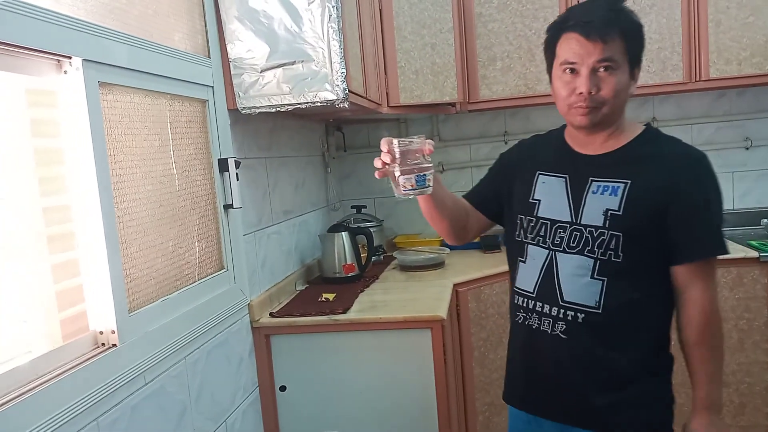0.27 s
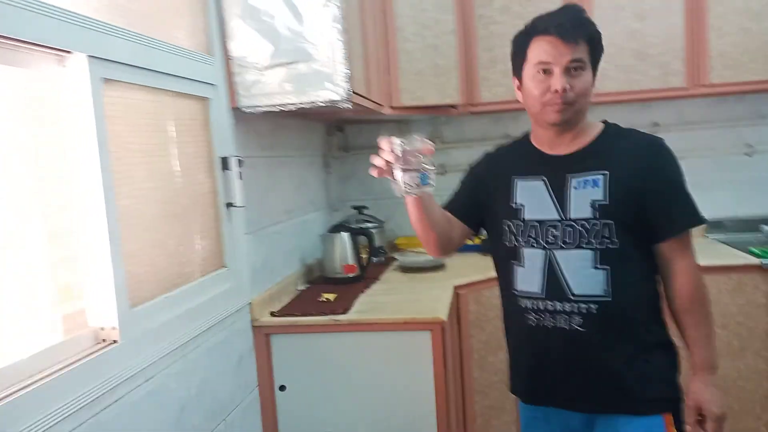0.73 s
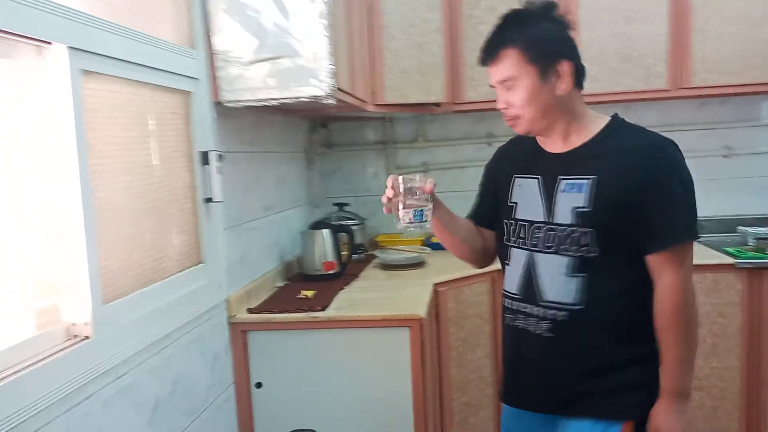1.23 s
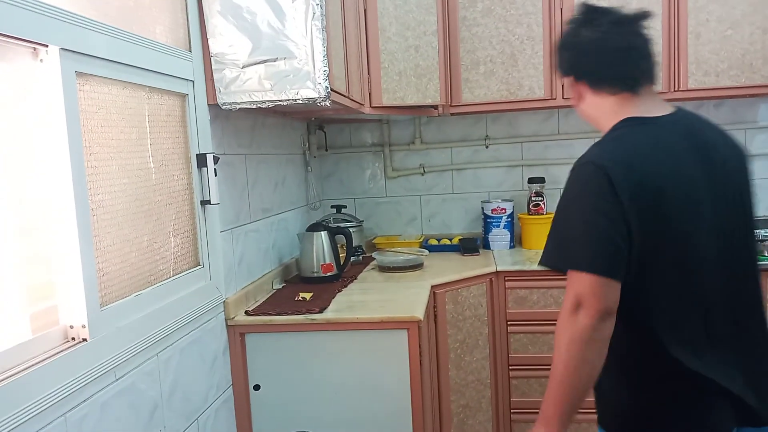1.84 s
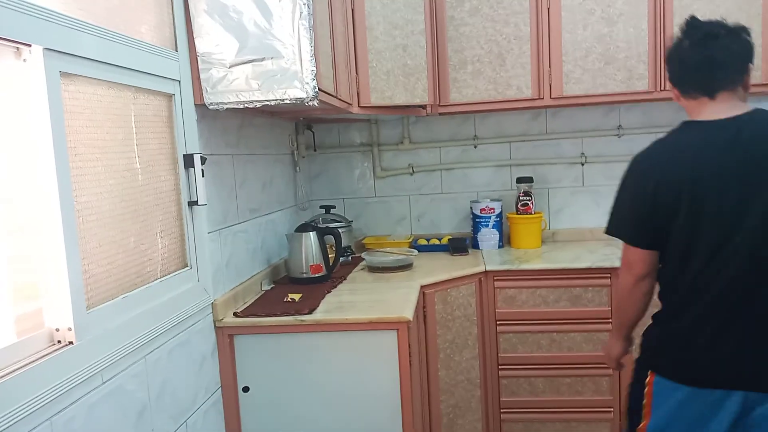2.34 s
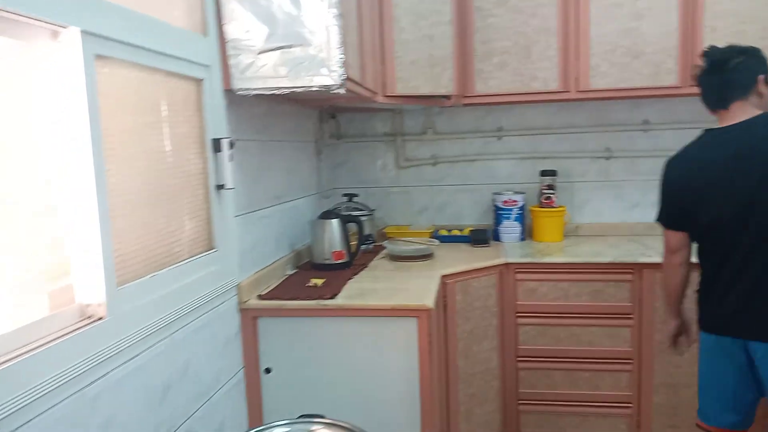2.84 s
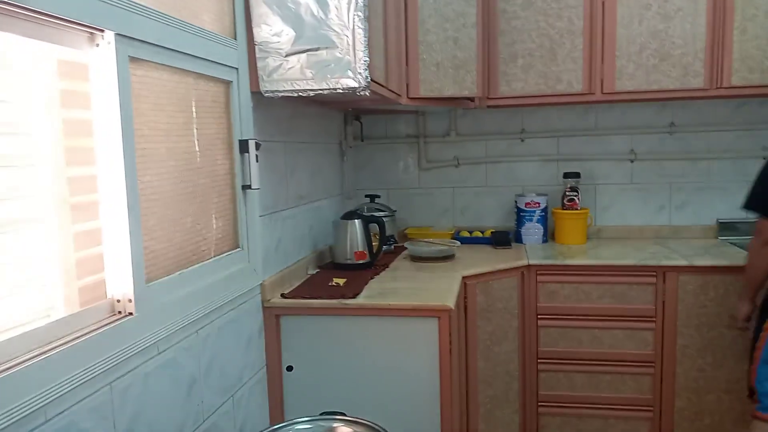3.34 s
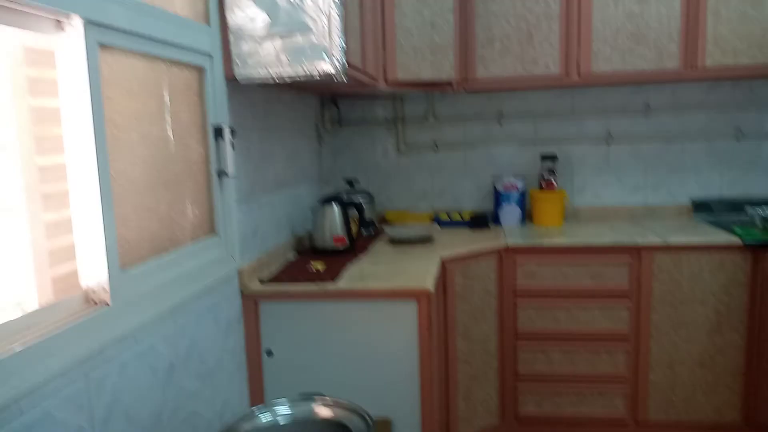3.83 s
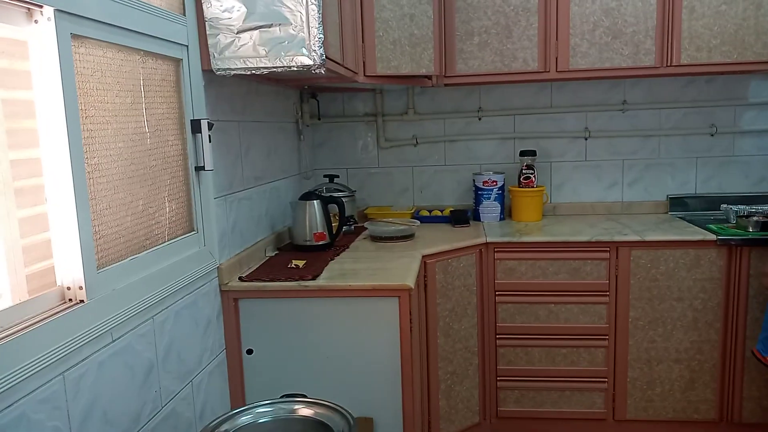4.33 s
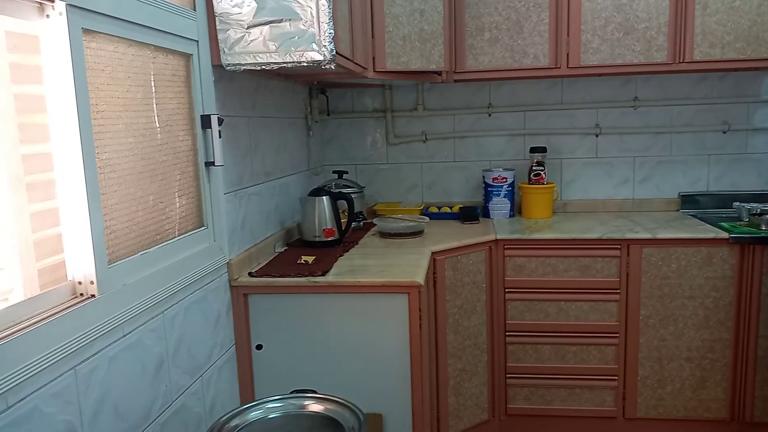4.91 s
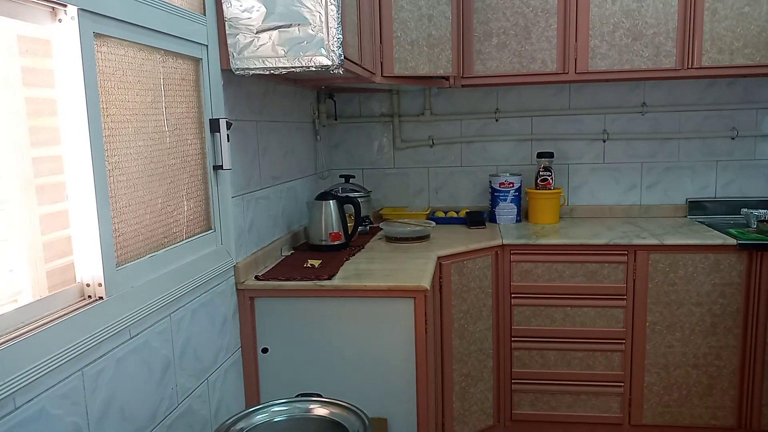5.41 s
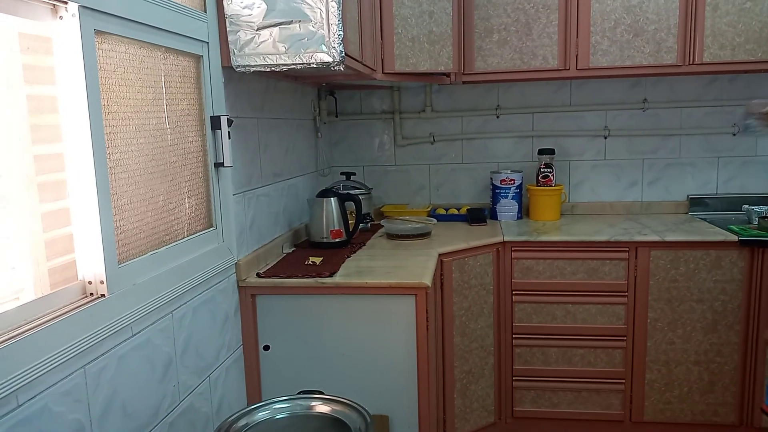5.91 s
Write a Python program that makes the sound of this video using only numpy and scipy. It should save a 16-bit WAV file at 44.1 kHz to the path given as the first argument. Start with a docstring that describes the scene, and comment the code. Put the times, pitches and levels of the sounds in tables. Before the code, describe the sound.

In a tiled kitchen, a phone picks up the soft, continuous bubbling and steamy hiss of a lidded pan, a little louder on the left. Slippers move off with a handful of sharp, thin slaps, gritty drags and dull thuds, each step ringing briefly in the room. Later only lighter shuffles remain while the pan keeps cooking. A low hum and occasional faint, brief tones lie underneath.

```python
"""Food simmers under a lid in a tiled kitchen: tiny bubbles burst by the thousand and ring pan and lid,
steam hisses at the rim, the house rumbles below. Almost at once someone in slippers starts to walk off:
soles slap and scuff, heels thud, the hard room rings after them, and faint hoots come and go.
The last slap falls at 3.3 s; scuffs trail on to about 6 s while the pan keeps simmering.
Two unlike phone microphones listen; the left one is louder and a millisecond late."""
import sys
import numpy as np
from scipy import signal
from scipy.fft import rfft, irfft, next_fast_len
from scipy.io import wavfile
from scipy.ndimage import uniform_filter1d

SR = 44100
rng = np.random.default_rng(int(sys.argv[2]) if len(sys.argv) > 2 else 0)


def generate_wav(signal):
    """Clip the signal to [-1, 1] and save it as 16-bit WAV at the path in sys.argv[1]."""
    frames = np.transpose(np.atleast_2d(signal))
    scaled = np.clip(frames, -1, 1) * 32767
    pcm = np.round(scaled).astype(np.int16)
    wavfile.write(sys.argv[1], SR, pcm)


N = 271950


def simmer(ring_db=-3, hiss_db=-1, foam_bend=0.004):
    """The ringing pan and its steam swell and sink with the strength of the boil."""
    # strength of the boil: t/s, overall level/dB, boost of the low resonances/dB
    strength = [(0.0, -46.5, -0.5), (0.74, -46, 1.5), (1.92, -47, 1), (2.09, -46.5, 2), (3.45, -46, 1),
                (4.1, -47, -0.5), (6.17, -46.5, -2)]
    times, *curves = np.transpose(strength)
    overall_db, boost_db = (np.interp(np.arange(N) / SR, times, curve) for curve in curves)
    ring, hiss = bubbles(), steam()
    # the foam rises and sinks, bending every resonance a little
    bent = np.arange(N) + np.cumsum(foam_bend * walk(7.5))
    ring = np.array([np.interp(bent, np.arange(N), side) for side in ring])
    low = colour(ring, [2600, 3100], [0, -40])  # slow bubbles drive the low resonances
    ring += (undb(boost_db) - 1) * low
    return (level(ring, ring_db) + close_echoes(level(hiss, hiss_db))) * undb(overall_db)


def bubbles(bursts_per_s=9000, wander_db=2):
    """Each bursting bubble is a tiny puff of noise that rings pan and lid."""
    # pan and lid resonances: f/Hz, width/Hz, left level/dB, right level/dB
    resonances = [(688, 23, -9, -7), (783.5, 71, 1.5, 2), (943, 74, 1.5, 3.5), (1045, 41, -4, -3.5),
                  (1350, 87, 4, 6.5), (1432, 102, 5.5, 7), (1564, 190, -2.5, -37), (2147, 130, 5, 3.5),
                  (2350, 97, 2.5, -5), (2512, 180, 2, -20), (3258, 55, -1, 2.5), (3710, 130, 2.5, -1),
                  (4090, 107, 2.5, -6), (4333, 124, 0.5, 2.5), (4584, 110, -2, 5), (4893, 140, 0, 1.5),
                  (5310, 180, -3.5, -12.5), (5600, 93, -6.5, 8.5), (5865, 160, 0, 3), (6250, 180, 5, 1),
                  (6550, 120, 4, -8), (6730, 156, 6.5, -0.5), (7003, 130, 0, -15), (7970, 120, -16, -21),
                  (8115, 170, -0.7, -6), (7440, 260, 3.5, -7)]
    onsets = (rng.random(N) < bursts_per_s / SR).astype(float)
    bursts = level(uniform_filter1d(onsets, size=24) * stereo_noise(0.09), 0)
    ring = np.zeros((2, N))
    for hz, width_hz, left_db, right_db in resonances:
        # the boiling spot wanders, so each resonance swells alone; low ones most
        drift = 0.96 * np.tanh(walk(4.13)) + 2 * np.tanh(walk(18))
        swell = undb(wander_db * (1000 / hz) ** 0.21 * drift)
        mode = band(band(bursts, hz, width_hz), hz, 2 * width_hz) / np.sqrt(width_hz)
        ring += undb([[left_db], [right_db]]) * swell * mode
    return ring


def steam(patchy_db=1.58):
    """Steam escapes at the rim in a bright, unsteady hiss."""
    hiss = colour(stereo_noise(0.15),
                  [540, 640, 700, 1000, 1180, 1400, 1800, 2300, 2900, 4200, 7000, 16000],
                  [-51, -12, -2.5, -4.5, -17.5, -2, -6.5, -0.5, -5.5, 0, 1.5, -5.5])
    hiss *= undb(0.4 * walk(6.43) + 0.23 * walk(25.13))
    for hz in (1100, 1800, 2900):  # the lower hiss comes and goes in patches
        hiss += (undb(patchy_db * walk(6.5)) - 1) * band(hiss, hz, 0.46 * hz)
    return hiss


def slaps(pop_decay_cycles=2.3, snap_decay_s=0.00061):
    """A sole meets the tiles: trapped air pops and the rubber snaps."""
    # sole hits: t/s, pop level/dB, pop f/Hz, snap level/dB
    hits = [(0.477, -28, 3340, -24), (0.4791, -28.5, 1760, -27.5), (0.494, -36, 2200, -40),
            (0.4987, -29, 3540, -25), (1.9656, -23, 2700, -38), (1.969, -33, 2440, -42),
            (2.046, -44, 1900, -45), (2.5075, -25.5, 2400, -41), (2.5101, -29, 2250, -38),
            (2.5225, -27.5, 1000, -46), (2.7512, -39, 2410, -28), (3.26, -55, 9000, -36),
            (3.304, -30, 1580, -27)]
    out, t = np.zeros(N), np.arange(SR // 20) / SR
    bright = level(colour(rng.standard_normal(N), [1500, 4000, 9000, 13000], [1, 5.5, -1.5, 3]), 0)
    for start, pop_db, hz, snap_db in hits:
        span = slice(int(start * SR), int(start * SR) + len(t))
        pop = np.exp(-hz * t / pop_decay_cycles) * np.sin(2 * np.pi * hz * t)
        snap = np.exp(-t / snap_decay_s) * bright[span]
        out[span] += undb(pop_db) * pop + undb(snap_db) * snap
    return colour(out, [500, 1000], [-14, 0])  # a thin sole has no bass


def scuffs(swish_decay_s=0.073):
    """A sole drags over the tiles: grit rasps under it and the sole swishes."""
    # drags: t/s, attack/s, rasp decay at 2 kHz/s, rasp f/Hz, rasp level/dB, swish level/dB
    drags = [(.31, 0.037, .06, 2500, -77, -49), (0.486, 0.016, 0.055, 2480, -48.5, -41.5),
             (1.17, 0.022, 0.053, 2480, -50.5, -45), (1.43, 0.053, 0.057, 2260, -51, -48),
             (1.964, 0.003, 0.073, 1190, -38, -39), (2.506, 0.008, 0.05, 1080, -42, -45),
             (2.705, 0.021, 0.081, 2090, -47.5, -58), (2.735, 0.018, 0.043, 2200, -57, -48),
             (3.141, 0.032, 0.069, 2560, -46, -40), (3.2, 0.018, 0.04, 1880, -52, -52),
             (3.245, 0.043, 0.13, 2000, -65, -45), (3.3, 0.0062, 0.068, 1710, -48, -49),
             (3.52, 0.02, 0.036, 1580, -49.5, -62), (3.665, 0.04, 0.11, 2310, -46, -44),
             (4.84, 0.11, 0.12, 2200, -56, -50), (4.965, 0.025, 0.05, 2200, -61, -47),
             (5.07, 0.021, 0.049, 1980, -55.5, -47), (5.67, 0.093, 0.093, 1520, -58, -44.5)]
    out, t = np.zeros((2, N)), np.arange(N) / SR
    stick_slip = undb(1.5 * walk(90))
    grit = colour(stereo_noise(0.43) * stick_slip, [450, 700], [-14, 0])
    # the floor lies off the pan's side, where the left microphone keeps more treble
    left, right = stereo_noise(0.079) * stick_slip
    left = colour(left, [1990, 5000, 9150, 12500, 16000], [-28, -8, -7, 3.5, -0.5])
    right = colour(right, [2000, 5030, 9000, 16100], [-16, -5, -9.5, -0.5])
    sheen = level(np.array([left, right]), 0)
    for start, attack, decay, hz, rasp_db, swish_db in drags:
        span = slice(int(start * SR), int(start * SR) + SR // 2)
        swell = np.sin(np.pi / 2 * np.clip((t[span] - start) / attack, 0, 1)) ** 2
        past_peak = np.maximum(t[span] - start - attack, 0)
        rasp = level(band(band(grit[:, span], hz, 1.1 * hz), hz, 2.3 * hz), rasp_db)
        rasp *= np.exp(-past_peak / decay * (hz / 2000) ** 0.37)  # lower rasps linger longer
        swish = undb(swish_db) * sheen[:, span] * np.exp(-past_peak / swish_decay_s)
        out[:, span] += swell * (rasp + swish)
    return out


def thuds(attack_s=0.04, relative_width=0.77):
    """The floor drums low under a heel: a quick swell of narrow noise."""
    # weight landing on the floor: t/s, f/Hz, level/dB
    landings = [(.5, 70.5, -61), (.79, 70, -60), (.96, 84, -57), (1.25, 103, -57), (1.97, 420, -57),
                (2.0, 62, -50.5), (2.55, 85, -47.5), (2.51, 400, -48), (3.15, 288, -47.5), (3.3, 280, -56),
                (3.68, 288, -54), (4.96, 60, -59)]
    out, t, shake = np.zeros((2, N)), np.arange(SR // 3) / SR, stereo_noise(0.75)
    swell = t / attack_s * np.exp(1 - t / attack_s)
    for start, hz, db in landings:
        span = slice(int(start * SR), int(start * SR) + len(t))
        drum = band(band(shake, hz, relative_width * hz), hz, relative_width * hz)
        out[:, span] += swell * level(drum[:, span], db)
    return out


def room(x, t60_s=0.64, treble_t60_s=0.45, crossover_hz=4000, build_s=0.0027, echo_db=-23.5):
    """Tiled walls: echoes thicken for a few milliseconds, then die away, treble first."""
    t, noise = np.arange(SR) / SR, rng.standard_normal((2, SR))
    low = signal.lfilter(*signal.butter(2, crossover_hz, fs=SR), noise)
    tail = low * undb(-60 * t / t60_s) + (noise - low) * undb(-60 * t / treble_t60_s)
    echoes = tail * (1 - np.exp(-t / build_s)) * undb(echo_db)
    return signal.fftconvolve(np.broadcast_to(x, (2, N)), echoes, axes=1)[:, :N]


def close_echoes(x, echo_db=-36, peak_s=0.015):
    """Stove top and wall tiles close to the pan ripple the spectrum with quick echoes."""
    t = np.arange(SR // 10) / SR
    echoes = undb(echo_db) * rng.standard_normal((2, len(t))) * t / peak_s * np.exp(1 - t / peak_s)
    echoes[:, 0] = 1  # the direct sound
    echoes /= np.linalg.norm(echoes, axis=1, keepdims=True)
    return signal.fftconvolve(x, echoes, axes=1)[:, :N]


def hoots(waver_hz=5, right_db=-7):
    """Short, soft tones swell and fade left of centre, wavering slightly."""
    # tones: peak t/s, f/Hz, level/dB, length/s
    tones = [(0.27, 241, -46, 0.1), (0.305, 950, -55, 0.1), (0.65, 241.4, -46.5, 0.097),
             (.81, 237, -54, .05), (0.961, 950, -54, 0.15), (1.119, 237, -48.5, 0.096),
             (1.317, 673, -56.5, 0.061), (1.494, 700, -50, 0.04), (1.563, 1040, -50.5, .025),
             (1.628, 732, -52, .08), (2.196, 239, -55.5, 0.09), (2.297, 2220, -43, 0.013),
             (2.32, 2154, -47, 0.024), (2.924, 810, -54, 0.049), (3.175, 318, -40, .02),
             (3.194, 312, -38, 0.014), (3.224, 330, -41, 0.014), (3.266, 243, -42, 0.043),
             (3.331, 930, -49, 0.015), (3.386, 303, -47.5, 0.025), (3.415, 924, -50, .045),
             (3.88, 834, -50, .05), (4.582, 3260, -59, 0.06), (4.718, 3255, -58, 0.25),
             (5.1, 518, -48, 0.055), (5.339, 929, -57.5, 0.071), (5.66, 870, -52, 0.063),
             (6.039, 768, -54, 0.062)]
    out, offsets = np.zeros(N), np.arange(-SR // 4, SR // 4)
    t = offsets / SR
    waver = np.cumsum(waver_hz * walk(45)) / SR
    flutter = undb(1.1 * walk(80))
    for peak, hz, db, length in tones:
        span = np.clip(int(peak * SR) + offsets, 0, N - 1)
        swell = undb(db) * np.exp(-(2 * t / length) ** 2)
        out[span] += swell * flutter[span] * np.sin(2 * np.pi * (hz * t + waver[span]))
    return out * undb([[0], [right_db]])


def rumble(fade_db_per_s=0.3):
    """The house hums low in uneven patches and slowly quietens; its deepest part comes in bumps."""
    # tone of the hum: f/Hz, level/dB
    spectrum = [(25, -24), (60, -6.5), (110, 0), (165, -2.5), (240, 2), (350, -6), (500, -7.5), (800, -26),
                (2000, -38)]
    noise, centres_hz = stereo_noise(0.7), 31 * 1.62 ** np.arange(8)
    patchy = sum(band(noise, hz, 0.5 * hz) * undb(1.66 * walk(9)) for hz in centres_hz)
    hum = level(colour(patchy, *np.transpose(spectrum)), -58.5)
    hum *= undb(0.7 * walk(4.92) - fade_db_per_s * np.arange(N) / SR)
    deep = band(band(stereo_noise(0.74), 61, 70), 66, 110)
    bumps = level(deep * undb(4.7 * walk(20)), -67)
    return hum + bumps


def undb(db):
    """Decibels to gain."""
    return 10 ** (np.asarray(db) / 20)


def level(x, db):
    """Scale to an rms level."""
    return x * undb(db) / np.sqrt(np.mean(x ** 2))


def band(x, hz, width_hz):
    """One resonance, gain 1 at its centre."""
    return signal.lfilter(*signal.iirpeak(hz, hz / width_hz, fs=SR), x)


def colour(x, hz, db):
    """Equalise along a curve through f/Hz, level/dB points."""
    size = next_fast_len(N + 4096)
    f = np.maximum(np.arange(size // 2 + 1) * SR / size, 1)
    gain = undb(np.interp(np.log(f), np.log(hz), db))
    return irfft(rfft(x, size) * gain, size)[..., :N]


def walk(rate_hz):
    """Smooth random modulation: values held for 1 / rate_hz seconds and slewed twice."""
    hold = int(SR / rate_hz)
    steps = np.repeat(rng.standard_normal(N // hold + 1), hold)
    return 2.47 * uniform_filter1d(uniform_filter1d(steps, hold), hold)[:N]


def stereo_noise(shared):
    """White noise with a share of its power common to both sides."""
    common, own = rng.standard_normal(N), rng.standard_normal((2, N))
    return np.sqrt(shared) * common + np.sqrt(1 - shared) * own


def scene():
    """Pan, steps, hoots and house rumble; only slaps and scuffs feed the room's reverb."""
    slap, scuff = slaps(), scuffs()
    reverb_send = undb(-10) * slap + undb(-9) * scuff
    return simmer() + slap + scuff + room(reverb_send) + thuds() + hoots() + rumble()


def record(dry, left_lag_samples=44, top_hz=15750):
    """Each microphone colours the sound, the right one leads, the top is cut."""
    # microphone colour: f/Hz, left level/dB, right level/dB
    response = [(29.8, -17, -22), (540, -3.5, -7.5), (1890, 2.5, -8), (6500, 3, -5.5), (7420, 4.5, -10),
                (8750, 0.15, -19.5), (9150, -5.5, -9.5), (10650, -12, -5.5), (11360, -29.5, -4),
                (12300, -18, -17), (13600, -33, -17), (14000, -40, -32), (14160, -12.5, -32),
                (15300, -10, -8)]
    hz, *curves = np.transpose(response)
    left, right = (colour(side, hz, db) for side, db in zip(dry, curves))
    both = np.array([left, np.roll(right, -left_lag_samples)])
    return signal.sosfilt(signal.ellip(12, 0.2, 80, top_hz, fs=SR, output="sos"), both)


dry = scene()
out = record(dry)
generate_wav(out)
```